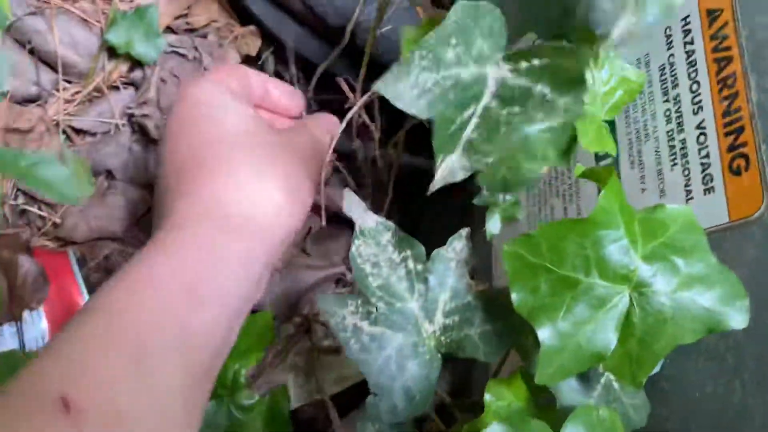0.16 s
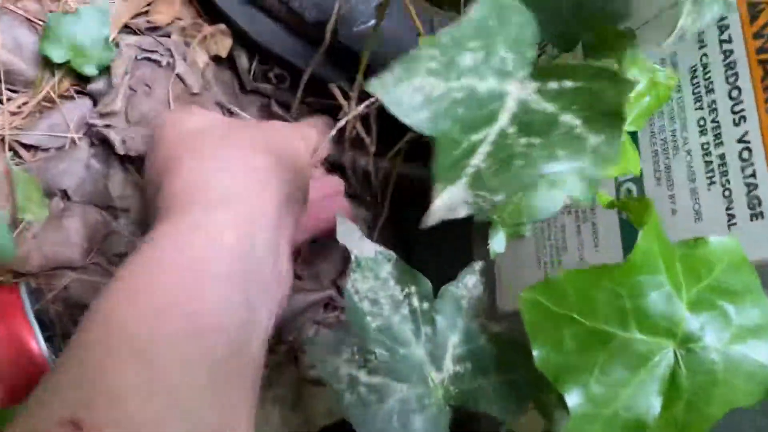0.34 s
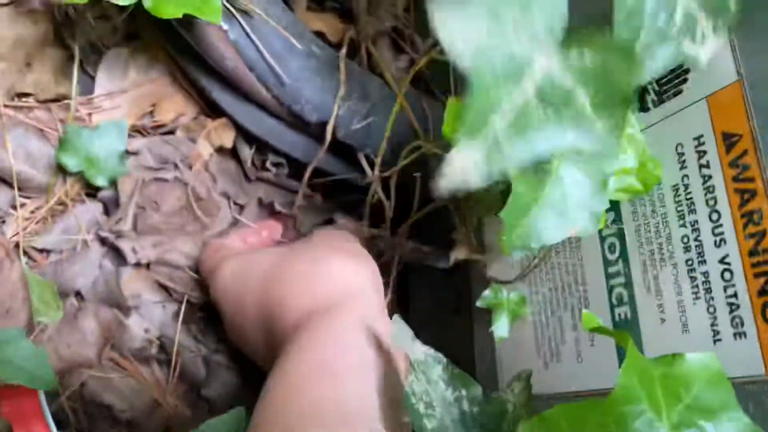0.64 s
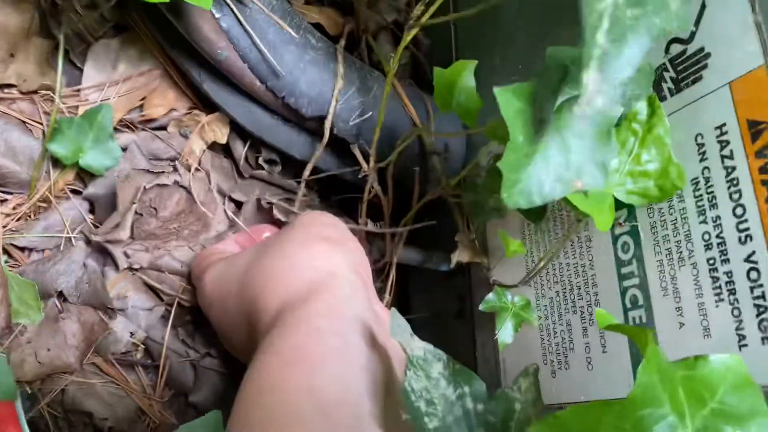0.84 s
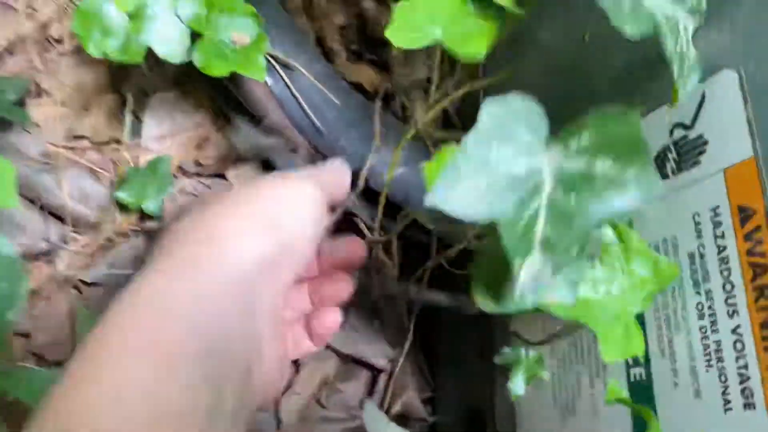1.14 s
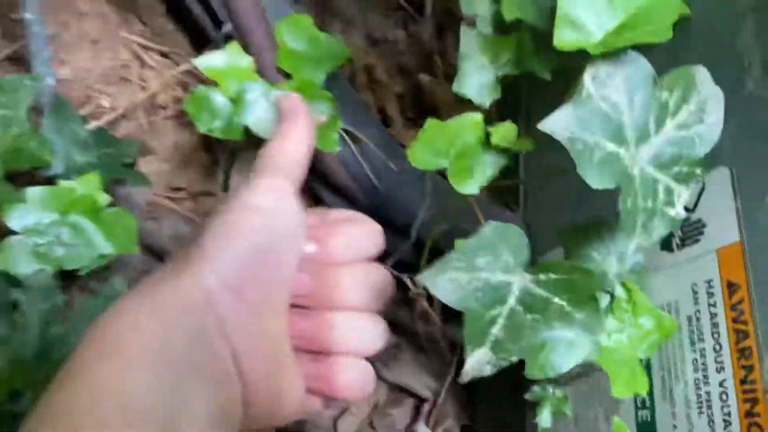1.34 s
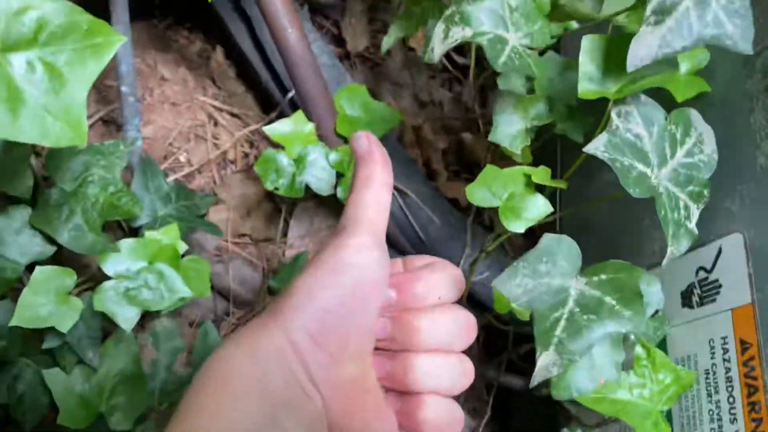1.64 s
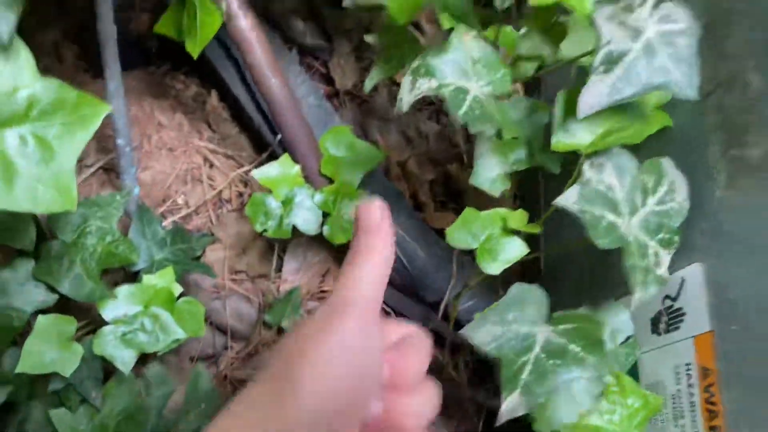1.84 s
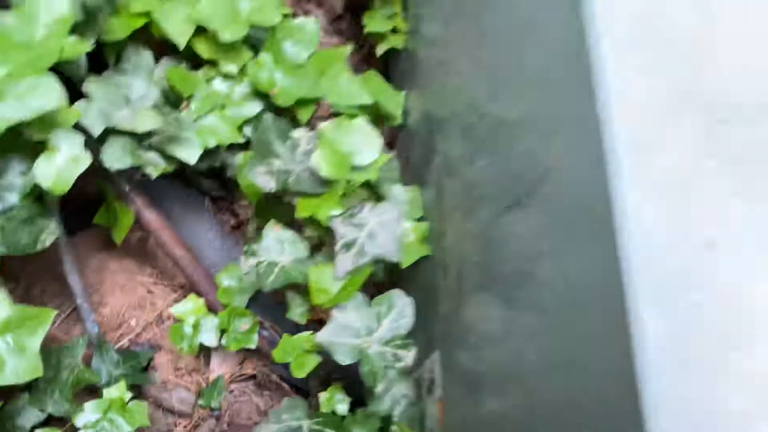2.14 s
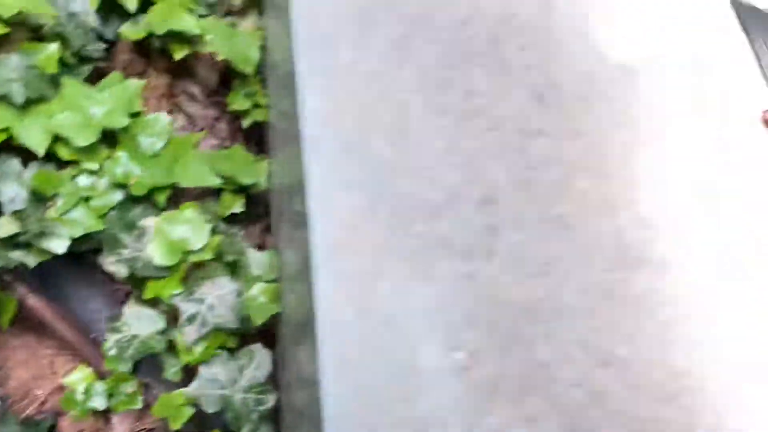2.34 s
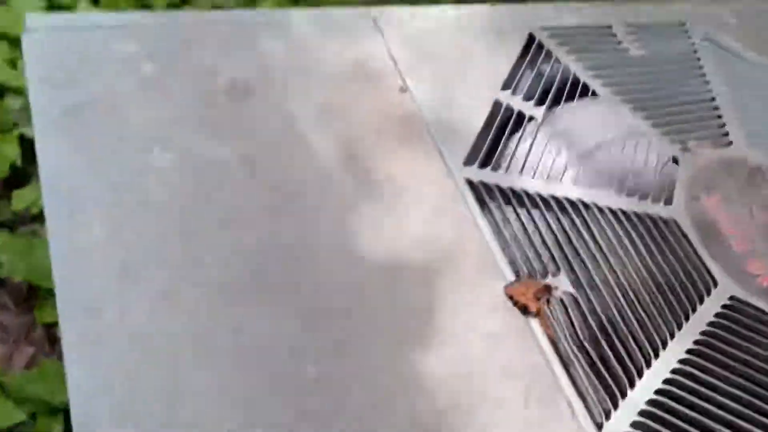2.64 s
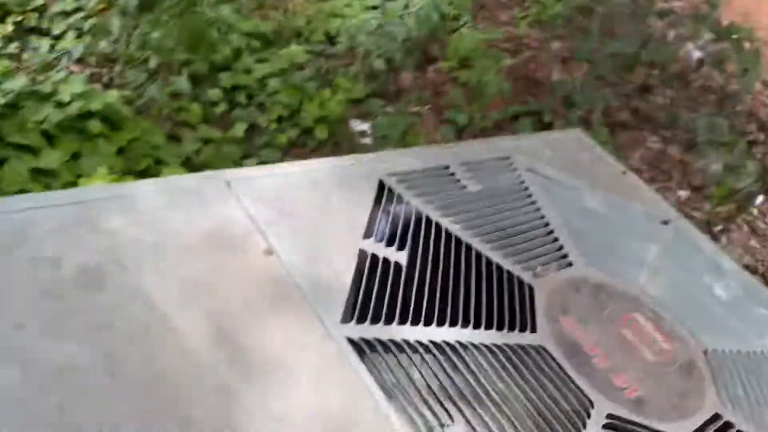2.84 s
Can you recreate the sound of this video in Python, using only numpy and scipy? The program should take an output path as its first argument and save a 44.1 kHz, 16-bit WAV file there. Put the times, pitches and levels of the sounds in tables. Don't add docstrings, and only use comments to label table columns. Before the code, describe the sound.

Air conditioner drone outdoors, with leaf rustling and twig snaps, then a bump and louder rushing fan air.

```python
import sys
import numpy as np
from scipy import signal
from scipy.fft import rfft, irfft
from scipy.io import wavfile
from scipy.ndimage import uniform_filter1d, minimum_filter1d

SR = 44100
rng = np.random.default_rng(int(sys.argv[2]) if len(sys.argv) > 2 else 0)


def gain_from_db(level_db):
    decades = np.asarray(level_db, float) / 20
    return 10 ** decades


def unload_wav(signal):
    wavfile.write(
        sys.argv[1],
        SR,
        np.round(np.clip(np.atleast_2d(signal).T, -1, 1) * 32767).astype(np.int16),
    )


N = 132300
TIME_S = np.arange(N) / SR
BIN_HZ = np.arange(N // 2 + 1) * SR / N
UPPER_BIN_HZ = np.arange(1, N // 2 + 2) * SR / N

# (multiple [-], level [dB rms])
COMPRESSOR_ORDERS = [(1, -22.5), (4, -34.5)]
BLADE_ORDERS = [(1, -39.5), (2, -26), (3, -35), (4, -46), (6, -37)]
MAINS_ORDERS = [(2, -32.5), (4, -36), (6, -41)]
# (frequency [Hz], density [dB per Hz])
CABINET_SPECTRUM = [(30, -17), (45, -2.5), (80, -0.5), (105, 2), (160, -3), (250, -8),
                    (350, -10.5), (550, -14.5), (660, -14.5), (800, -19), (960, -22.5), (2400, -35),
                (4600, -39), (12000, -55.5)]
GRILLE_SPECTRUM = [(100, -27), (200, -2), (370, 2.5), (540, -14), (780, -6), (1000, -15), (2100, -19),
                   (12000, -47)]
# (time [s], gain [dB])
FIN_CLIMB = [(0, 1.5), (1.2, 2), (1.8, 1.5), (1.95, 3.5), (2.18, 8), (2.3, 1), (3, 4)]
# (time [s], gain [dB])
GRILLE_RISE = [(0, -45), (1.9, -44), (2.15, -19), (2.3, -7.5), (2.45, -2), (2.7, 0.5), (3, -2)]
# (time [s], gain above the corner [dB])
GRILLE_BRIGHTNESS = [(2.2, 5), (2.4, -0.5), (2.7, 0), (2.9, 0), (2.94, 1), (3, 11)]
# (centre [Hz], width [Hz], gain [dB])
LOW_POCKETS = [(273, 38, -8), (390, 32, 5.5), (488, 20, 3.5), (518, 20, -5)]
RAISED_POCKETS = [(280, 13, -4), (318, 30, 4), (443, 30, -4.5), (621, 25, 5.5), (687, 44, -8.5),
                  (1100, 150, 3), (3000, 300, 3)]
# (time [s], level [dB])
HAND_EFFORT = [(0, -30), (.12, -36), (.135, -48), (.18, -37.5), (.21, -26), (.28, -34), (.375, -31.5),
               (.42, -41), (.58, -30.5), (.655, -45), (.68, -37.5), (.75, -35.5), (.85, -45), (.92, -46),
               (.99, -33), (1.125, -37.5), (1.18, -47.5), (1.35, -63)]
# (frequency [Hz], density [dB per Hz])
LEAF_SPECTRUM = [(700, -8.5), (1300, -6), (2200, -7.5), (4200, -1.5), (6000, -8), (7300, -9), (11500, -13),
                 (15000, -16)]
SPRIG_SPECTRUM = [(560, -11), (780, 1), (1300, 0.5), (2500, -7), (5000, -4.5), (7500, -8), (10000, -12.5),
                  (14000, -13.5)]
# (time [s], peak [dB], pitch [Hz], t60 [s])
SNAPS = [(0.105, -27.5, 4560, 0.027), (0.1652, -16, 5000, 0.029), (0.2009, -20, 3930, 0.022),
         (0.217, -19, 6900, 0.028), (0.3022, -32, 4750, 0.022), (0.326, -39, 4440, 0.022),
         (0.4693, -24, 4430, 0.02), (0.4976, -20.5, 3830, 0.02), (0.5252, -35, 3820, 0.022),
         (0.547, -37, 2950, 0.022), (0.6774, -23, 3960, 0.024), (0.682, -30, 3970, 0.022),
         (0.6977, -25, 3840, 0.022), (0.7573, -21, 4900, 0.024), (0.7618, -21.5, 4100, 0.022),
         (0.7896, -26, 5100, 0.022), (0.8088, -23, 3850, 0.029), (0.8284, -37, 3800, 0.022),
         (0.854, -22.5, 10200, 0.018), (0.8821, -25, 4560, 0.025), (0.9433, -30, 4470, 0.022),
         (1.0864, -24, 4860, 0.022), (1.1248, -29, 4600, 0.022), (1.187, -31, 4170, 0.02),
         (1.262, -31.5, 3380, 0.018)]
KNOCKS = [(0.033, -26.5, 1030, 0.058), (.208, -23.5, 1040, 0.12), (.326, -27, 2320, 0.045),
          (.165, -19.5, 2260, 0.035), (.812, -27.5, 580, 0.13), (3.6, -18, 1990, 0.027),
          (.3268, -24.5, 4500, 0.022), (2.929, -18, 860, 0.034), (.196, -24, 4100, .05),
          (.303, -21, 5000, .02), (2.177, -16, 270, .04), (2.155, -24, 950, .1), (2.17, -24, 1400, .05),
          (2.188, -22, 1050, 0.054), (2.1995, -15.5, 450, 0.052), (2.1992, -11, 774, 0.037),
          (2.2, -18, 1130, .05), (2.212, -20.5, 460, 0.064)]
TICKS = [(.1055, -22, 11000, 0.011), (.1654, -20, 3500, 0.0078), (.1656, -23, 7500, .012),
         (.809, -26, 5500, .01), (.8843, -28, 6000, .01), (.3272, -17, 4550, 0.0095),
         (.4988, -33, 11000, .01), (.6815, -20, 11200, .012), (.6968, -27, 10500, .01),
         (.7535, -30, 11000, .008), (.7578, -26, 11500, .008), (.7905, -24, 11300, .008),
         (.8085, -29, 10500, .01), (.8285, -26, 11000, .008), (.8543, -23, 10500, .012),
         (.8838, -33, 10500, 0.011), (.902, -31, 8000, .006), (1.087, -24, 11000, .008),
         (1.125, -24, 11000, .008)]
# (time [s], level [dB], hold [s], t60 [s])
BRUSHES = [
    (2.1984, -12.5, 0.0085, 0.02),
    (2.2095, -10.5, 0.0031, 0.029),
    (2.2133, -11, 0.0019, 0.039),
    (2.214, -24, 0.0076, 0.24),
]
# (frequency [Hz], likeness [0-1])
LIKENESS = [(40, 0.84), (120, 1), (250, 0.95), (550, 0.83), (1100, 0.34), (4000, 0.05), (7000, 0.23),
            (11000, 0)]
GRILLE_LIKENESS = [(100, .9), (350, 1), (550, 0.83), (1000, 0.39), (1700, 0.92), (3000, 0.24), (7000, 0.43),
                   (11000, 0.71)]
# (frequency [Hz], phase [rad])
FROM_CABINET = [(0, .15), (470, 2.6), (800, 3.5), (950, 4.3), (1400, 8.2), (2000, 9), (2400, 12.1),
                (6400, 25.13)]
FROM_GRILLE = [(0, .3), (350, .9), (450, .2), (600, -1.6), (900, .8), (2000, 1), (2800, 3), (6400, 6.28)]
FROM_GROUND = [(0, -6.3), (1000, -7.5), (2500, -3.5), (3400, 0), (4000, 1), (4800, 0), (5500, -3),
               (6400, -6.28)]
FROM_SPRIG = [(0, 0), (500, -1.5), (1700, -2), (2200, -3.4), (2800, -4.3), (5400, -4), (6000, -4),
              (6400, -6.28)]
PORT_PHASE = [(7300, 0), (9100, 3.14), (9500, 3.14), (10400, 6.28), (11700, 6.28), (12500, 9.42),
              (13700, 9.42), (14400, 12.57)]
# (frequency [Hz], gain [dB])
MICROPHONE = [(7500, 0), (8800, -2.5), (9900, -0.5), (12300, -4), (12700, -6), (13600, -6), (14200, -11),
              (15600, -14)]

COMPRESSOR_HZ, BLADE_HZ, MAINS_HZ = 58.76, 36.12, 59.97
COMPRESSOR_LEAD_S, BLADE_LEAD_S, MAINS_LEAD_S = 0.0117, 0.0092, 0.0058
BESIDE_DB, FINS_FROM_HZ = -23.5, 190
GRILLE_DB, BRIGHT_FROM_HZ = -22.5, 3500
LIFT_START_S, LIFT_END_S = 1.03, 1.46
ONE_PORT_HZ = 8200
LIMIT_DB, SQUEEZE, ATTACK_S, HOLD_S, RELEASE_DB_PER_S = -14.5, 1.72, 0.0085, 0.099, 133
CUTOFF_HZ = 15800


def cooling_unit():
    beside = rotations() + cabinet_air()
    return arrive(beside, FROM_CABINET, pan_db=-1.2) + arrive(grille_air(), FROM_GRILLE, pan_db=-1.7)


def rotations():
    compressor = hum(COMPRESSOR_HZ, COMPRESSOR_ORDERS, 0.91, 0.027, COMPRESSOR_LEAD_S)
    blades = hum(BLADE_HZ, BLADE_ORDERS, 1.0, 0.04, BLADE_LEAD_S)
    mains = hum(MAINS_HZ, MAINS_ORDERS, 1.93, 0.027, MAINS_LEAD_S)
    return compressor + blades + mains


def hum(hz, orders, wobble_db, wander_rad, lead_s):
    turn = 2 * np.pi * hz * (TIME_S + lead_s) + wander_rad * drift(6.6)
    out = 0
    for multiple, db in orders:
        wobble = drift(4.4) + 0.63 * drift(3.9) * [[1], [-1]]
        phase = multiple * turn + 0.14 * drift(2.2) * [[1], [-1]]
        out = out + gain_from_db(db + 2.5 + wobble_db * wobble) * np.sin(phase)
    return out


def cabinet_air():
    air = gain_from_db(BESIDE_DB) * coloured(CABINET_SPECTRUM, shared_db=0.4, own_db=0.7)
    raised = in_time([(LIFT_START_S, 0), (LIFT_END_S, 1)])
    air = (1 - raised) * pockets(air, LOW_POCKETS) + raised * pockets(air, RAISED_POCKETS)
    fins = above_corner(air, FINS_FROM_HZ, 4)
    return air + (gain_from_db(in_time(FIN_CLIMB)) - 1) * fins


def grille_air():
    noise = coloured(GRILLE_SPECTRUM, shared_db=0.5, own_db=0.8, likeness=GRILLE_LIKENESS)
    air = gain_from_db(GRILLE_DB + in_time(GRILLE_RISE)) * noise
    treble = above_corner(air, BRIGHT_FROM_HZ, 2)
    return air + (gain_from_db(in_time(GRILLE_BRIGHTNESS)) - 1) * treble


def leaf_rustle():
    grains_per_s, grain_s = 900, 0.0003
    sizes = gain_from_db(3.0 * np.minimum(rng.exponential(1, N), 2.5))
    sizes = sizes * (rng.random(N) < grains_per_s / SR)
    r = np.exp(-1 / (grain_s * SR))
    grain = 1 + 0.8 * signal.lfilter([1 - r], [1, -2 * r, r * r], sizes)
    hiss = coloured(LEAF_SPECTRUM, shared_db=0.3, own_db=0.93, grain=grain)
    return arrive(gain_from_db(in_time(HAND_EFFORT)) * hiss, FROM_GROUND, pan_db=1.6)


def impacts(rows, width, broad_db, attack_s):
    out, t = np.zeros(N + SR), np.arange(SR // 8) / SR
    broad_band = signal.butter(2, [1800, 13000], "band", fs=SR, output="sos")
    for start_s, db, hz, t60_s in rows:
        burst = rng.standard_normal(len(t)) * gain_from_db(-60 * t / t60_s) * np.minimum(t / attack_s, 1)
        pitch_band = signal.butter(2, [hz / width, hz * width], "band", fs=SR, output="sos")
        tuned = signal.sosfilt(pitch_band, burst)
        broad = signal.sosfilt(broad_band, burst)
        sound = tuned + gain_from_db(broad_db) * broad
        start = int(start_s * SR)
        out[start:start + len(t)] += gain_from_db(db) * sound / np.abs(sound).max()
    return arrive(out[:N], FROM_GROUND, pan_db=1.9)


def sprig_brush():
    shape = 0
    for start_s, db, hold_s, t60_s in BRUSHES:
        decay_s = np.clip(TIME_S - start_s - hold_s, 0, 1)
        onset = np.clip((TIME_S - start_s) / 0.003, 0, 1)
        shape = shape + gain_from_db(db - 60 * decay_s / t60_s) * onset
    return arrive(shape * coloured(SPRIG_SPECTRUM, shared_db=0.19, own_db=0.79), FROM_SPRIG, pan_db=3.5)


def coloured(spectrum, shared_db, own_db, grain=1.0, likeness=LIKENESS):
    together = drift(4.1) + drift(42)
    hz = np.maximum(BIN_HZ, 1)
    alike = np.clip(at_hz(likeness, hz), 0, 1)
    alike = 1 - (1 - alike) / (1 + (hz / ONE_PORT_HZ) ** 12)
    colour = gain_from_db(at_hz(spectrum, hz)) * (hz > 0.8 * spectrum[0][0])
    mid, side = rfft(rng.standard_normal((2, N)) * grain) * colour
    pair = np.sqrt(1 + alike) * mid + np.sqrt(1 - alike) * side * [[1], [-1]]
    out = 0
    for octave in np.arange(0, 10, 0.5):
        share = np.cos(np.pi * np.clip(np.log2(hz / 22) - octave, -0.5, 0.5)) ** 2
        flicker_db = shared_db * together + own_db * drift(4.3)
        out = out + gain_from_db(flicker_db) * irfft(pair * share, N)
    return rms_one(out)


def pockets(x, rows):
    gain_db = sum(db / (1 + ((BIN_HZ - centre_hz) / width_hz) ** 2) for centre_hz, width_hz, db in rows)
    return irfft(rfft(x) * gain_from_db(gain_db), N)


def above_corner(x, corner_hz, order):
    return irfft(rfft(x) / (1 + (corner_hz / UPPER_BIN_HZ) ** order), N)


def arrive(x, lead, pan_db):
    pan = gain_from_db(-pan_db / 2 / (1 + (BIN_HZ / 6500) ** 8))
    turn = np.exp(0.5j * np.interp(BIN_HZ, *np.transpose(lead))) * pan
    return irfft(rfft(x * np.ones((2, 1))) * [1 / turn, turn], N)


def drift(rate_hz):
    r = np.exp(-80 * np.pi * rate_hz / SR)
    slow = signal.lfilter([1], [1, -2 * r, r * r], rng.standard_normal(N // 40 + 2002))[2000:]
    return np.interp(np.arange(N) / 40, np.arange(len(slow)), rms_one(slow - slow.mean()))


def in_time(rows):
    return np.interp(TIME_S, *np.transpose(rows))


def at_hz(points, hz):
    points_hz, values = np.transpose(points)
    return np.interp(np.log(hz), np.log(points_hz), values)


def rms_one(x):
    return x / np.sqrt(np.mean(x ** 2) + 1e-20)


def scene():
    snaps = impacts(SNAPS, width=1.28, broad_db=-7, attack_s=0.0016)
    knocks = impacts(KNOCKS, width=1.12, broad_db=-49, attack_s=0.0038)
    ticks = impacts(TICKS, width=1.4, broad_db=-10, attack_s=0.00037)
    return cooling_unit() + leaf_rustle() + snaps + knocks + ticks + sprig_brush()


def gain_control(x):
    power = np.diff(x[0], prepend=0) ** 2 + 0.042 * x[0] ** 2
    level_db = 10 * np.log10(uniform_filter1d(power, size=221) + 1e-12)
    hold = int(HOLD_S * SR)
    wanted_db = SQUEEZE * np.clip(level_db - LIMIT_DB, 0, 30)
    cut_db = -minimum_filter1d(-wanted_db, size=hold, origin=(hold - 1) // 2)
    ramp_db = RELEASE_DB_PER_S * TIME_S
    cut_db = np.maximum(np.maximum.accumulate(cut_db + ramp_db) - ramp_db, 0)
    r = np.exp(-1 / (ATTACK_S * SR))
    return x * gain_from_db(-signal.lfilter([1 - r], [1, -r], cut_db))


def low_pass(x):
    return signal.sosfilt(signal.butter(12, 16500, fs=SR, output="sos"), x)


def record(dry):
    x = gain_control(arrive(dry, PORT_PHASE, pan_db=0))
    response = gain_from_db(at_hz(MICROPHONE, UPPER_BIN_HZ)) * (BIN_HZ < CUTOFF_HZ)
    x = irfft(rfft(x) * response, N)
    mix = np.clip(x, -0.9, 0.9)
    return low_pass(mix)


dry = scene()
out = record(dry)
unload_wav(out)
```